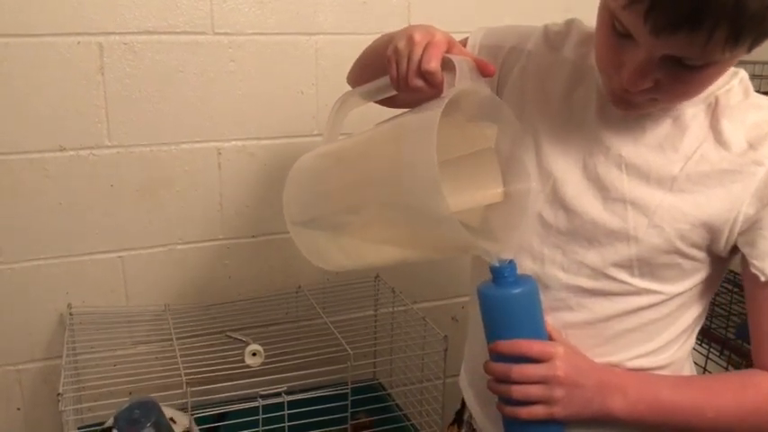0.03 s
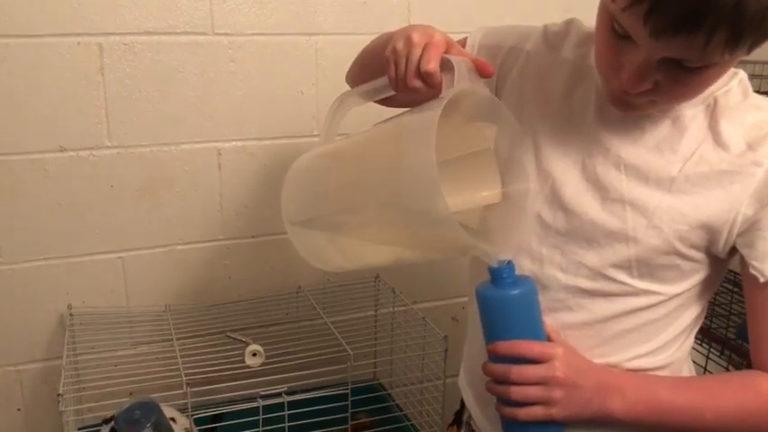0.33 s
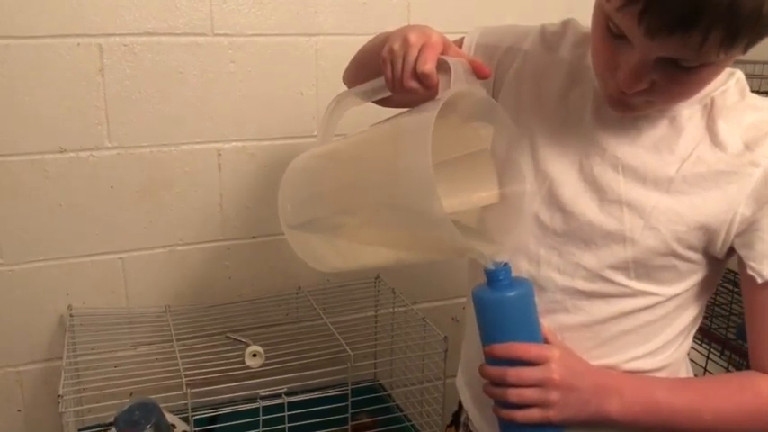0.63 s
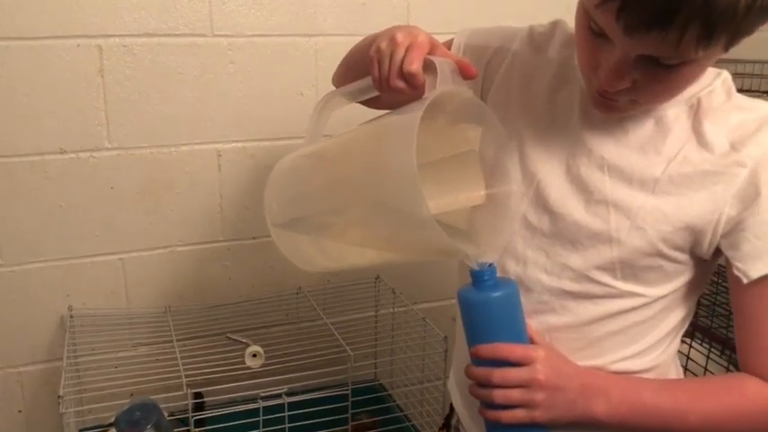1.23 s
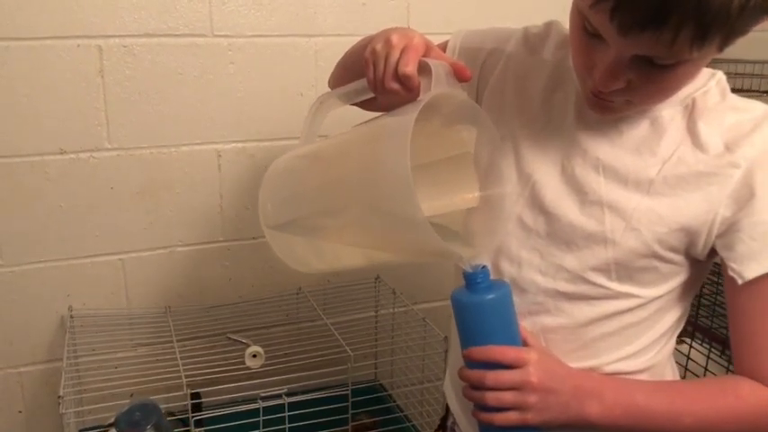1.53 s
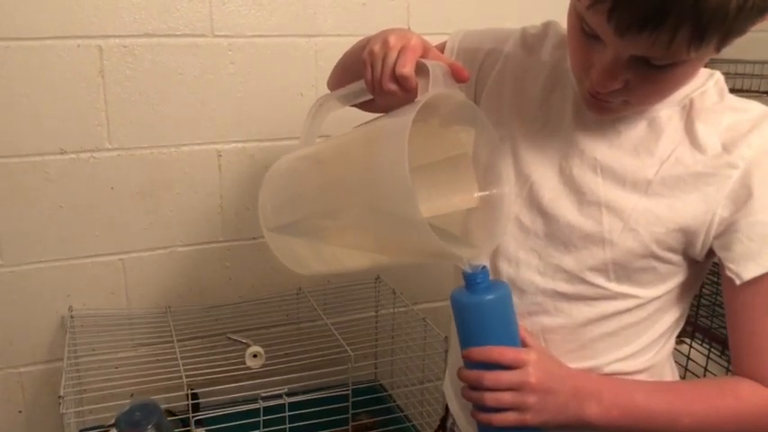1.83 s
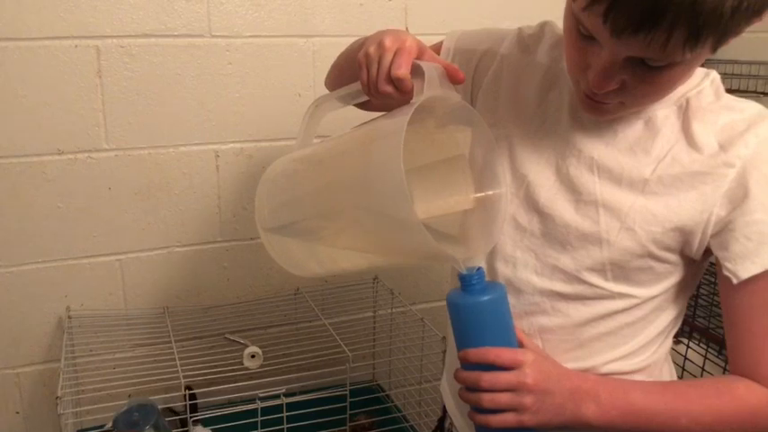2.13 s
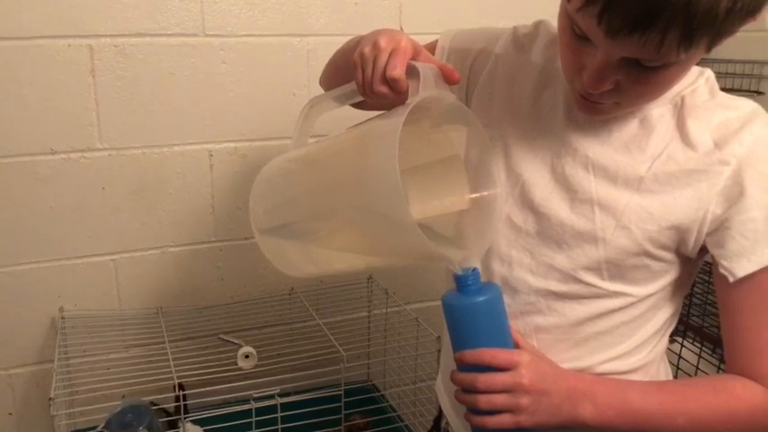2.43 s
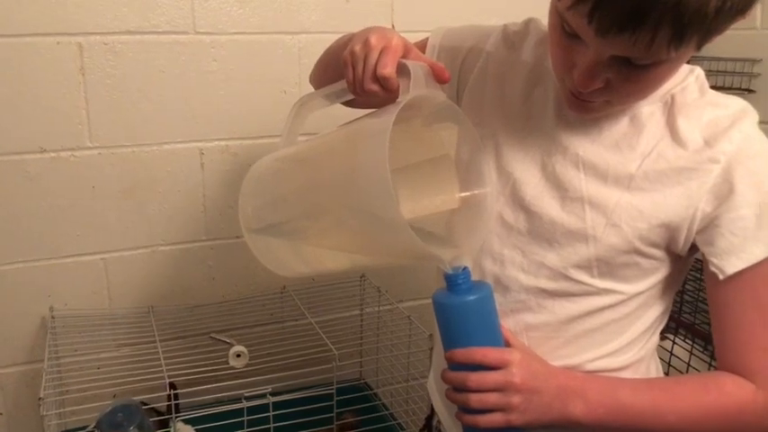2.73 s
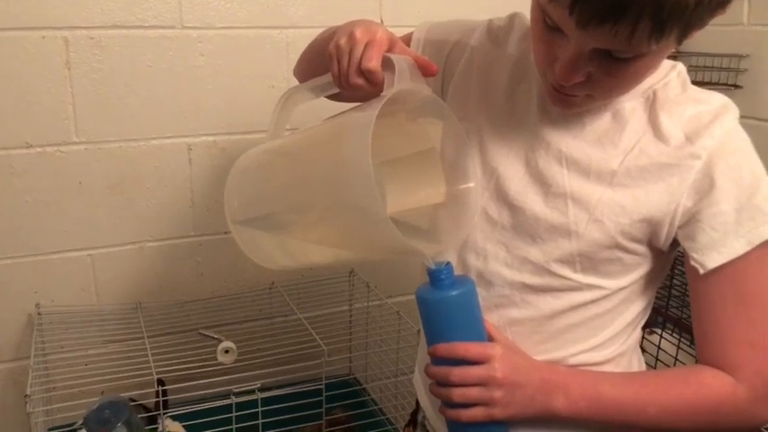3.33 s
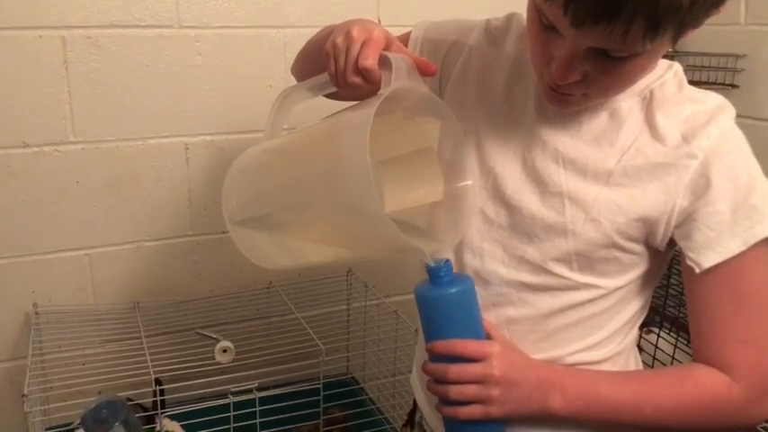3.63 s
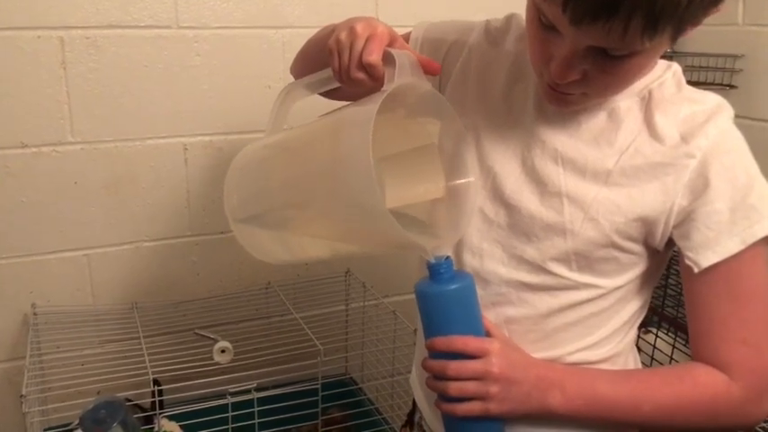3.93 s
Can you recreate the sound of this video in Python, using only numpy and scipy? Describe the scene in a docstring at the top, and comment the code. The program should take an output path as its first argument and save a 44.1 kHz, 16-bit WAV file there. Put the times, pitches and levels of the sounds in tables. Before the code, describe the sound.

A thin, uneven stream of water fills a bottle, dripping and plopping in a small room.

```python
"""Water pours in a thin, uneven stream from a plastic pitcher into a narrow-necked bottle, in a small
block-walled room. Drops tick on the neck first; trapped air then plops and gulps, with fine bubbles
and spray crackling between. The drops are loudest from 1.6 to 1.9 s. Near 2.1 s a dull rumble, probably
from handling, stirs the room's low modes; by 2.7 s the neck's thin ring has grown, and the strongest
bump comes near 3.7 s. A faint hiss lies under it all."""
import sys
import numpy as np
from scipy import signal
from scipy.fft import rfft, irfft
from scipy.io import wavfile

SR = 44100
rng = np.random.default_rng(int(sys.argv[2]) if len(sys.argv) > 2 else 0)


def master_out(mix):
    """Clip the mix to full scale and print it as 16-bit PCM to the path in sys.argv[1]."""
    frames = np.transpose(np.atleast_2d(mix))
    ceiling = np.clip(frames, -1, 1)
    pcm = np.round(ceiling * 32767).astype(np.int16)
    wavfile.write(sys.argv[1], SR, pcm)


N = 176400
T = np.arange(N) / SR
HZ = np.fft.rfftfreq(N, 1 / SR)


def amp(db):
    """Amplitude ratio of a level in decibels."""
    return 10 ** (np.asarray(db) / 20)

def unit(x):
    """Normalisation to an rms of 1."""
    return x / np.sqrt(np.mean(x ** 2) + 1e-20)

def read(points, hz):
    """Interpolation on a logarithmic frequency axis."""
    f, value = np.transpose(points)
    return np.interp(np.log(hz + 1), np.log(f + 1), value)

def add(mix, s, sound):
    """Superposition: a sound joins the mix at s seconds."""
    part = mix[max(0, round(s * SR)):][:len(sound)]
    part += sound[:len(part)]

def noise(gain):
    """Spectral shaping: white noise, weighted in frequency, at an rms of 1."""
    return unit(irfft(rfft(rng.standard_normal(N)) * gain, N))

def bubble(hz, cycles, size=8000, onset_share=0.22, glide=0.0084):
    """Damped oscillation of trapped air: it swells, then decays by 1/e in `cycles` periods."""
    age = T[:size] * hz / max(cycles, .5)  # in decay times
    pitch = hz * (1 + glide * (np.minimum(age, 2) - 1))  # rises slightly
    turns = np.cumsum(pitch) / SR
    swell = (1 - np.exp(-age / onset_share)) * np.exp(-age)
    return swell / swell.max() * np.sin(2 * np.pi * turns)


# Drops striking the neck and the water (time [s], level [dB], frequency [Hz], decay [cycles])
DROP_IMPACTS = [(0.009,-34.5,2450,0.9), (0.1428,-27.5,3300,1.3), (0.214,-25.5,4220,1.83),
                (.669,-39.5,9500,11), (0.709,-42.5,6900,4.1), (0.7324,-30.5,2050,1.44),
                (0.7561,-27.5,4970,2.6), (0.855,-36.5,2700,3.7), (1.123,-38.5,4540,2.1), (1.25,-53,5220,13),
                (1.3183,-39.5,5520,6), (1.376,-50,4540,14), (1.462,-42,4200,1.7), (1.5446,-44,5860,6),
                (1.6007,-42.5,2830,2.6), (1.603,-42,5200,9.2), (1.619,-32,4430,2.9), (1.656,-19,4150,1.46),
                (1.6566,-25,2800,1.44), (1.7423,-27,5200,2.3), (1.8606,-26.5,1980,3), (1.861,-28,2670,3.3),
                (1.8635,-24.5,4000,0.76), (1.9642,-33,5170,1.1), (2.08,-51,7620,9.6), (2.141,-50.5,5390,23),
                (2.165,-41,6260,1.6), (2.169,-34.5,1513,4.3), (2.232,-37.5,2240,1.8), (2.326,-44,4360,2.2),
                (2.505,-35,1830,0.8), (2.55,-35.5,4130,1.8), (2.6548,-49.5,2923,10.3),
                (2.8889,-36,2600,1.64), (2.8939,-35,5100,2.1), (3.05,-40.5,4350,5.4),
                (3.1054,-26.5,3580,1.45), (3.177,-37.5,4430,3.6), (3.253,-41,3510,5.3), (3.264,-35,4000,4),
                (3.269,-26.5,6380,2.7), (3.579,-27,4530,2.4), (3.758,-34.5,3200,1), (3.9868,-42.5,5900,3.8)]
def drops():
    """Impulse excitation: each impact starts a brief damped oscillation."""
    out = np.zeros(N)
    for s, db, hz, cycles in DROP_IMPACTS:
        add(out, s, amp(db) * bubble(hz, cycles))
    return out

# Air pockets pinching off (time [s], relative level [dB], frequency [Hz])
AIR_POCKETS = [(0.12, -47.5, 1730), (0.401, -39, 1390), (0.571, -41.5, 1680), (0.599, -47.5, 1820),
               (0.735, -43, 1460), (0.823, -53, 960), (0.943, -42.5, 1950), (0.991, -51.5, 1600),
               (1.499, -47.5, 1334), (1.526, -41.5, 1470), (1.775, -45, 1590), (1.8607, -34, 1730),
               (1.951, -40, 1770), (1.997, -37.5, 1605), (2.613, -46.5, 1340), (2.665, -38, 1410),
               (2.712, -43.5, 1097), (2.766, -47, 1000), (2.811, -40, 1495), (2.929, -46.5, 988),
               (3.152, -45.5, 1500), (3.209, -43, 1620), (3.381, -40, 1560), (3.4302, -37, 1222),
               (3.53, -35, 1616), (3.544, -40.5, 1310), (3.599, -39, 1520), (3.715, -44.5, 1570)]
def plops(gain_db=1.5, cycles=2.78, count=5, shed_db=-11.5, shed_delay_s=.014, shed_octaves=0.38):
    """Bubble resonance: each pocket pulsates and sheds smaller and larger bubbles that ring in turn."""
    out = np.zeros(N)
    for s, db, hz in AIR_POCKETS:
        add(out, s, amp(db + gain_db) * bubble(hz, cycles))
        for wait, step in zip(rng.exponential(shed_delay_s, count), rng.standard_normal(count)):
            add(out, s + wait, amp(db + shed_db) * bubble(hz * 2 ** (shed_octaves * step), cycles))
    return out

# Water spattering on the plastic (time [s], level [dB], spectral peak [Hz])
RIM_SPATTERS = [(0.392,-43.5,2520), (0.667,-49,11800), (.822,-63,3000), (0.856,-48,3300),
                (0.932,-48.5,4760), (0.98,-59,12000), (1.121,-45,4800), (1.32,-47,12000), (1.656,-47,9000),
                (1.741,-48,5570), (1.861,-35.5,4970), (1.994,-40,5100), (2.445,-55,12100),
                (2.4806,-41,12100), (2.504,-41,2920), (2.549,-46.5,5030), (2.577,-40.5,12500),
                (2.808,-44.5,13000), (2.824,-47.5,4930), (2.928,-48,5560), (3.068,-51.5,6340),
                (3.21,-42,4630), (3.62,-45.5,5760), (3.674,-51,5000), (3.8684,-41,6000)]
def spatters(size=2048, rise_s=0.00041, decay_s=0.0038, width_octaves=0.51, skirt=0.12):
    """Impact noise: the stream breaks on the rim in short, grainy broadband bursts."""
    out, t, f = np.zeros(N), T[:size], np.fft.rfftfreq(size, 1 / SR)
    envelope = (1 - np.exp(-t / rise_s)) * np.exp(-t / decay_s)
    for s, db, hz in RIM_SPATTERS:
        band = skirt + np.exp(-.5 * (np.log2((f + 1) / hz) / width_octaves) ** 2)
        ripple_db = 3.5 * np.interp(f, np.linspace(0, SR / 2, 32), rng.standard_normal(32))
        grain_db = np.repeat(5.5 * rng.standard_normal(size // 32), 32)
        burst = irfft(rfft(rng.standard_normal(size)) * band * amp(ripple_db))
        add(out, s, amp(db) * unit(amp(grain_db) * burst) * envelope)
    return out

# Gulps of air through the choked neck (time [s], level [dB], frequency [Hz])
AIR_GULPS = [(.262, -46.5, 525), (0.496, -53.5, 218.4), (1.29, -53, 282), (1.328, -49, 286),
             (1.41, -51, 291.7), (2.667, -47, 286), (2.712, -47.5, 278.4), (3.11, -52.5, 303),
             (3.215, -47.5, 157), (3.376, -49, 293), (3.73, -43.5, 159.6), (3.985, -48.5, 280)]
def gulps(cycles=5.6, overtone_ratio=2.7, overtone_db=-9.5):
    """Cavity resonance: the air in the bottle rings low, with one inharmonic overtone."""
    out = np.zeros(N)
    for s, db, hz in AIR_GULPS:
        overtone = amp(overtone_db) * bubble(hz * overtone_ratio, 2 * cycles)
        add(out, s, amp(db) * (bubble(hz, cycles) + overtone))
    return out

def crackle(levels, colour, per_s, spread_db, cycles, ring_power=0, count=30):
    """Poisson process: small bubbles of random strength ring at random times, at `count` pitches."""
    out = np.zeros(N)
    lowest_hz = colour[0][0]
    for hz in np.geomspace(lowest_hz, colour[-1][0], count):
        strengths = amp(spread_db * np.minimum(rng.exponential(1, N), 4))
        train = strengths * (rng.random(N) < per_s / count / SR)
        ring = bubble(hz, cycles * (hz / lowest_hz) ** ring_power, size=1500)
        out += amp(read(colour, hz)) * signal.oaconvolve(train, ring)[:N]
    return unit(out) * amp(np.interp(T, *np.transpose(levels)))

# Envelope of the fine bubbles (time [s], relative level [dB])
FROTH_LEVELS = [(0,-58), (.17,-53), (.33,-65.5), (.41,-45.5), (.48,-74), (.6,-57.5), (.69,-72), (.92,-52),
                (1.1,-57.5), (1.23,-66.5), (1.33,-53), (1.6,-64.5), (1.72,-49), (2.04,-71), (2.3,-69.5),
                (2.55,-54.5), (2.72,-64), (2.87,-62), (2.95,-53.5), (3.23,-55), (3.33,-60.5), (3.44,-52),
                (3.75,-54.5), (3.85,-59.5), (4,-74)]
# Their strength by pitch (frequency [Hz], relative level [dB])
FROTH_SPECTRUM = [(400, -8.5), (700, -0.5), (1000, -3.5), (1600, 9.5), (2100, 3.5), (3000, 2), (4200, 4.5)]
def froth():
    """Incoherent summation: many fine bubbles merge into a crackle that follows the flow."""
    return amp(-6) * crackle(FROTH_LEVELS, FROTH_SPECTRUM, per_s=380, spread_db=3, cycles=3.5)

# Envelope of the spray (time [s], relative level [dB])
SPRAY_LEVELS = [(0,-64), (.2,-66), (.32,-71), (.41,-63.5), (.47,-64.5), (1.1,-66.5), (1.21,-77),
                (1.36,-67.5), (1.62,-66), (1.72,-64), (2.04,-62), (2.28,-75.5), (2.45,-62), (2.58,-67.5),
                (2.68,-64), (2.95,-66.5), (3.05,-63.5), (3.22,-60), (3.39,-65.5), (3.66,-58.5),
                (3.82,-66.5), (4,-68)]
# Droplet strength by pitch (frequency [Hz], relative level [dB])
SPRAY_SPECTRUM = [(2600, 4), (5400, 11), (7500, 0.5), (10000, 1.5), (15500, -3.5)]
def spray():
    """Quality factor rising with frequency: the finest droplets ring for the most cycles."""
    return amp(-4) * crackle(SPRAY_LEVELS, SPRAY_SPECTRUM, 260, spread_db=5, cycles=2.8, ring_power=1.17)

# Spectrum of breaking film (frequency [Hz], relative level [dB])
FIZZ_SPECTRUM = [(1500, 5.5), (5000, 7.5), (10000, 6), (16000, 0.5)]
def fizz(gain_db=-8, per_s=240, spread_db=4, decay_s=0.0017, contrast=1.7):
    """Shot noise: films break in tiny unpitched bursts that follow the spray with wider swings."""
    strengths = amp(spread_db * np.minimum(rng.exponential(1, N), 3.5))
    train = strengths * (rng.random(N) < per_s / SR)
    power = signal.lfilter([1], [1, -np.exp(-1 / (decay_s * SR))], train ** 2)
    spray_db = np.interp(T, *np.transpose(SPRAY_LEVELS))
    level_db = gain_db + spray_db.mean() + contrast * (spray_db - spray_db.mean())
    return unit(np.sqrt(power) * noise(amp(read(FIZZ_SPECTRUM, HZ)))) * amp(level_db)

# Resonances of the bottle's air (frequency [Hz], bandwidth [Hz], gain [ratio])
BOTTLE_MODES = [(979, 64, 1), (1400, 71, 0.5), (1651, 82, 0.49), (5370, 87, 0.98)]
# The neck's thin ring, coming out late in the pour (time [s], gain [ratio])
NECK_SWELL = [(2.55, 0.6), (2.72, 3.3)]
def bottle(splash, neck_hz=2939, neck_width_hz=23.5):
    """Forced resonance: the splashing drives the bottle's narrow modes."""
    def ring(hz, width):
        return signal.lfilter(*signal.iirpeak(hz, hz / width, fs=SR), splash)
    neck = np.interp(T, *np.transpose(NECK_SWELL)) * ring(neck_hz, neck_width_hz)
    return splash + neck + sum(gain * ring(hz, width) for hz, width, gain in BOTTLE_MODES)

# Reverberation time of the room (frequency [Hz], time to fall 60 dB [s])
REVERB_TIMES = [(150, 0.37), (600, 0.11), (1600, 0.32), (4500, 0.21), (9000, 0.19), (16000, 0.11)]
def tail(size=22050, density=0.1, rise_s=0.0009):
    """Reverberant decay: sparse reflections of random sign die away, each band at its own rate."""
    taps = rng.choice([-1., 1.], size) * (rng.random(size) < density)
    hz, t, bands = signal.stft(taps, SR, nperseg=256)
    decay = np.exp(-np.log(1000) * t / read(REVERB_TIMES, hz)[:, None])
    response = signal.istft(bands * decay, SR)[1][:size]
    response *= 1 - np.exp(-(T[:size] / rise_s) ** 2)
    return response / np.linalg.norm(response)

# Early reflections from near walls (delay [s], gain [ratio])
WALL_ECHOES = [(.0025, 0.13), (.0053, 0.25), (.0072, -0.29), (0.0126, 0.0018), (0.0156, 0.12)]
def room(direct, count=3, tail_db=-2):
    """Multipath propagation: direct sound, wall echoes, and a tail that shifts as the stream moves."""
    out = direct.copy()
    for delay, gain in WALL_ECHOES:
        add(out, delay, gain * direct)
    for k in range(count):
        share = np.sqrt(2 / count) * np.cos(np.pi * (T + k / count))  # constant-power crossfade
        out += amp(tail_db) * signal.oaconvolve(direct * share, tail())[:N]
    return out

# Dull bumps, probably from handling (peak time [s], level [dB], rise [s], decay [s])
HANDLING_BUMPS = [(.275, -53, 0.019, 0.057), (0.41, -52.5, 0.031, 0.11), (.51, -63, 0.03, 0.34),
                  (.92, -62.5, 0.079, 0.048), (2.0, -59, 0.15, 0.041), (2.08, -48, 0.12, 0.18),
                  (2.94, -55, 0.015, 0.24), (3.12, -50, 0.013, 0.097), (3.24, -51.5, 0.032, 0.15),
                  (3.47, -52, 0.12, 0.31), (3.748, -42, 0.022, 0.04)]
# Their spectrum (frequency [Hz], relative spectral density [dB])
BUMP_SPECTRUM = [(25, -75), (55, -14), (75, -0.5), (130, -15), (270, 4.5), (400, -7.5), (800, -10.5),
                 (1500, -22), (4000, -29), (12000, -56)]
# Low modes of the room (frequency [Hz], width [Hz], boost [dB])
STANDING_WAVES = [(75.8, 2.6, 16), (106, 6.1, 17), (158.5, 25.3, 18.5), (236, 9.5, 2.5), (265, 24, 3)]
def bumps():
    """Modal excitation: soft rubs and knocks swell and die, booming at the room's standing waves."""
    power = np.zeros(N)
    for s, db, rise, decay in HANDLING_BUMPS:
        envelope = np.exp(np.where(T < s, -.5 * ((T - s) / rise) ** 2, (s - T) / decay))
        power += (amp(db) * envelope) ** 2
    boom_db = sum(db / (1 + (2 * (HZ - hz) / width) ** 2) for hz, width, db in STANDING_WAVES)
    return np.sqrt(power) * noise(amp(read(BUMP_SPECTRUM, HZ) + boom_db))

# Background hiss (frequency [Hz], relative spectral density [dB])
HISS_SPECTRUM = [(20,-22), (45,-3), (75,-0.5), (270,5), (500,-2.5), (1000,-4.5), (1600,-10), (3000,-21.5),
                 (8000,-21), (16000,-21.5)]
def hiss(level_db=-67):
    """Stationary noise: a faint, steady floor, strongest at low frequencies."""
    return amp(level_db) * noise(amp(read(HISS_SPECTRUM, HZ)))


def scene():
    """Source and filter: the water sounds through bottle and room, over the bumps and hiss."""
    crackling = froth() + spray()
    water = drops() + plops() + spatters() + gulps() + crackling + fizz()
    return (room(bottle(water)) + bumps() + hiss())[None]

def record(dry, cutoff_hz=16200):
    """Band limiting: a linear-phase low-pass filter removes the highest treble."""
    lowpass = signal.firwin(401, cutoff_hz, window=("kaiser", 8), fs=SR)
    return signal.oaconvolve(dry, lowpass[None], "same")


dry = scene()
out = record(dry)
master_out(out)
```